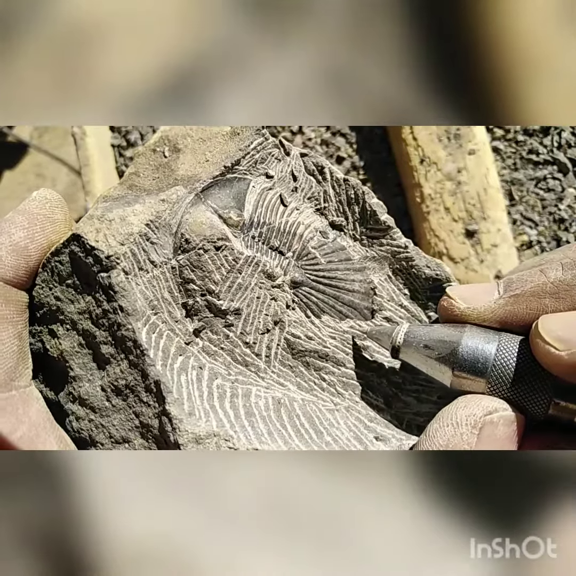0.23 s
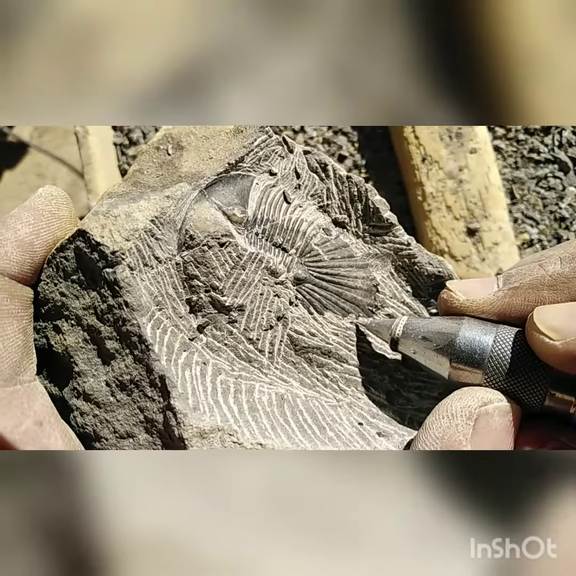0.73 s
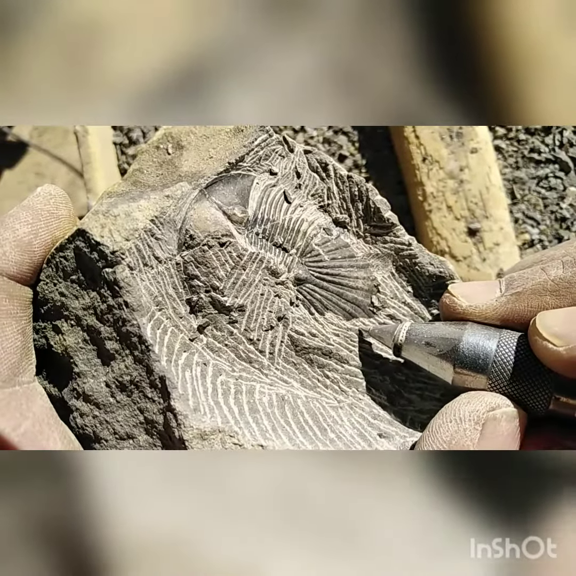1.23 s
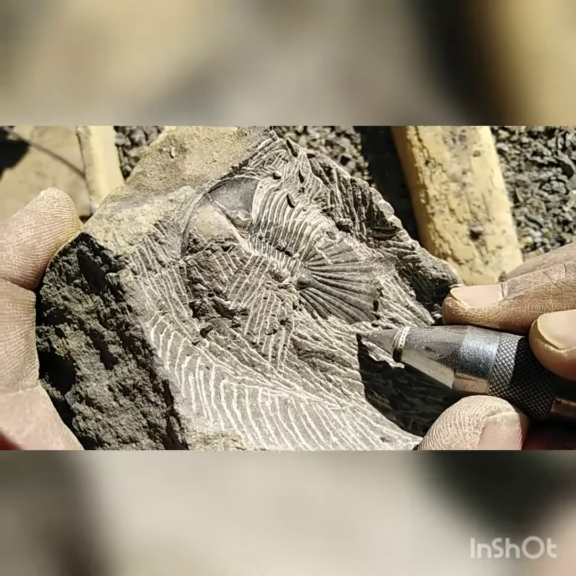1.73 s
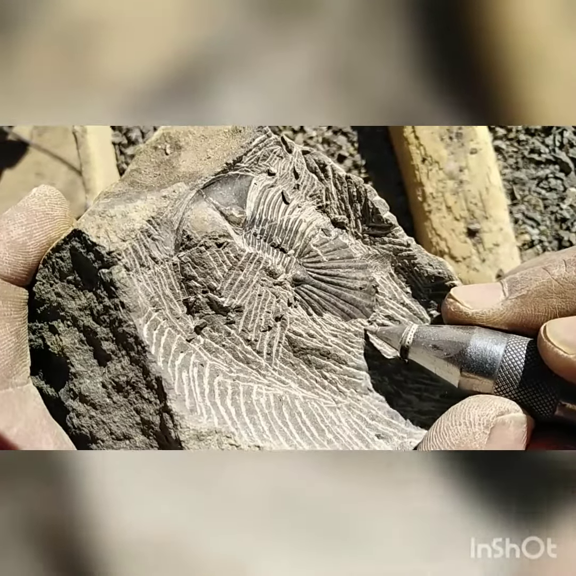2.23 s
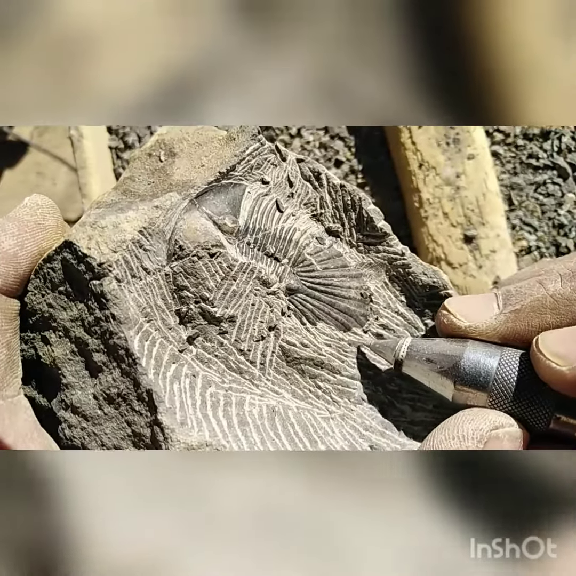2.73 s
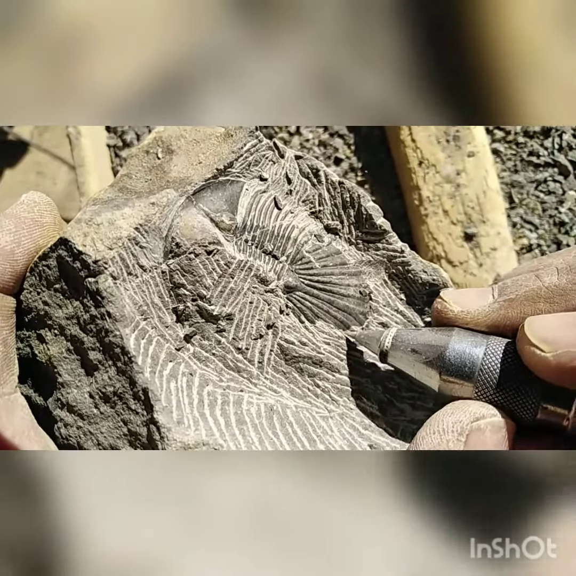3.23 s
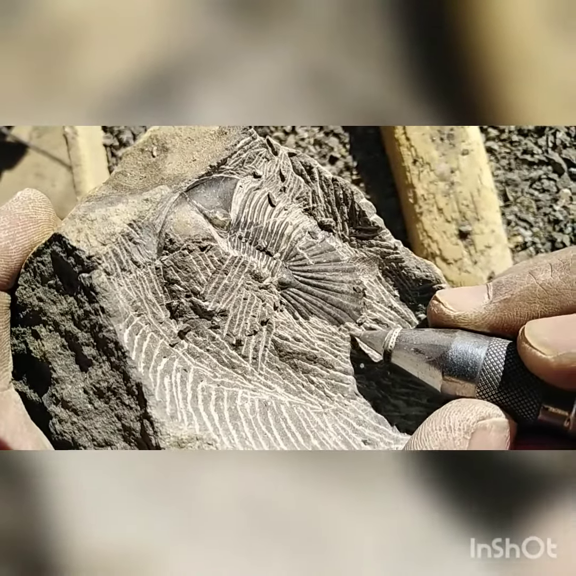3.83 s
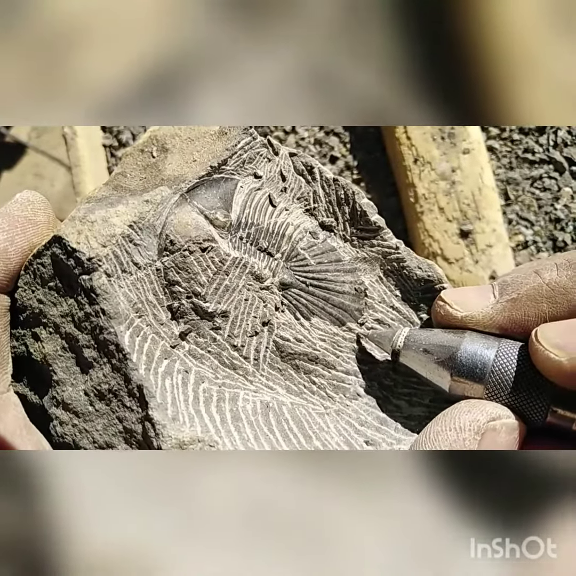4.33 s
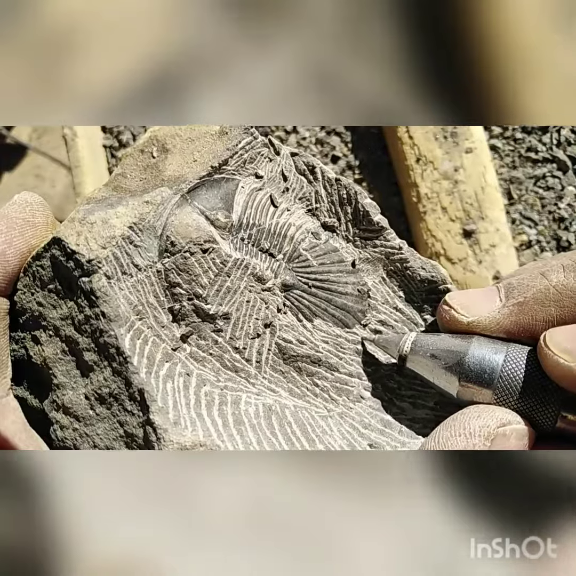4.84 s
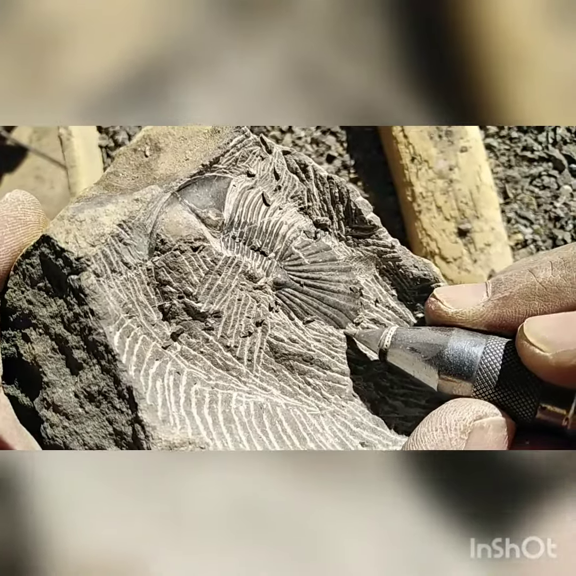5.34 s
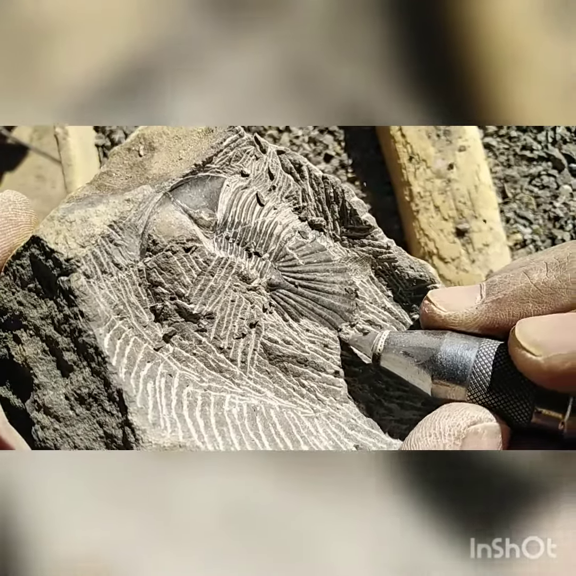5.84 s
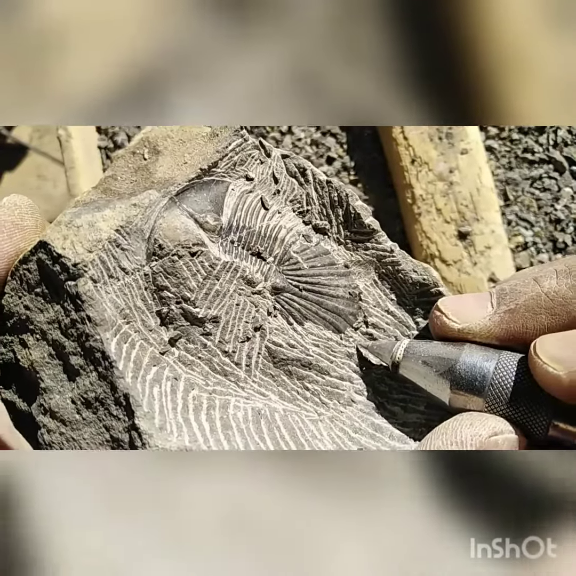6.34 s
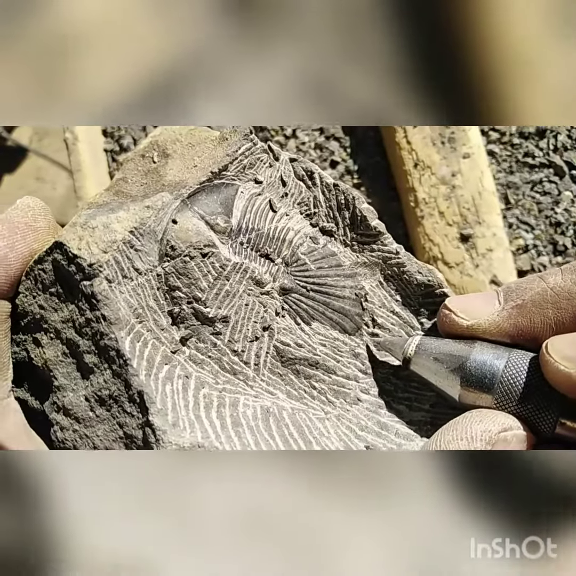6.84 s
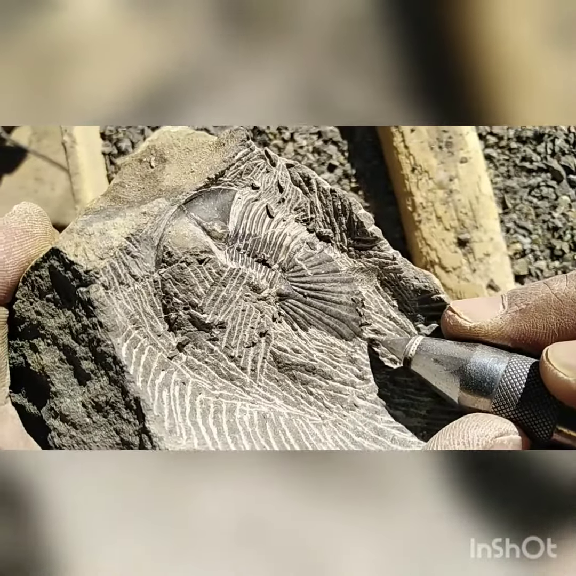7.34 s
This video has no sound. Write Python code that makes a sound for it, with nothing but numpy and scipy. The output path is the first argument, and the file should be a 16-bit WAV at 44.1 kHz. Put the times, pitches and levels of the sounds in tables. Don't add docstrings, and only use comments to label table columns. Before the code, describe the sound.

A small pneumatic scribe buzzes loudly up close, its low raspy drone rising under pressure as gritty, bright crackling bursts chip at stone.

```python
import sys
import numpy as np
from scipy import signal
from scipy.fft import irfft
from scipy.io import wavfile
from scipy.ndimage import uniform_filter1d, minimum_filter1d

SR = 44100
rng = np.random.default_rng(int(sys.argv[2]) if len(sys.argv) > 2 else 0)


def volts_from_db(level):
    exponent = np.asarray(level, float) / 20
    return 10 ** exponent


def generate_wav(sig):
    pcm = np.round(np.clip(np.atleast_2d(sig).T, -1, 1) * 32767).astype(np.int16)
    wavfile.write(sys.argv[1], SR, pcm)


N = 334719
T = np.arange(N) / SR
STEPS = np.arange(0, N / SR, .001)
FREE_HZ = 425.4
TIP_LAG = 17.5

# start_s, exhaust_db, hovering_graze_db, bright_crack_tilt_db
GRIP = [(0, -25.5, -35, -15), (.5, -25, -29, -8), (.9, -25.5, -45, -7), (1.4, -25.5, -40, -13),
        (2, -26, -33, -11), (2.6, -25.5, -43, -9.5), (3.3, -25.5, -38, -9.5), (3.8, -23, -28, -6),
        (4.3, -25, -30, -6.5), (4.6, -25, -20, -6), (5.3, -25.5, -26, -8), (5.9, -23.5, -25, -7.5),
        (6.24, -30.5, -41, -11), (6.33, -23, -31, -6), (6.6, -26.5, -33, -9), (6.9, -26, -26.5, -12.5),
        (7.2, -26.5, -30, -7), (7.59, -29, -29, -14.5)]


def evened(x):
    return x / np.sqrt(np.mean(x ** 2) + 1e-20)


def curves(rows):
    s, *columns = np.transpose(rows)
    return [np.interp(T, s, c) for c in columns]


def ramp(t0, t1):
    length = np.maximum(t1 - t0, 1e-3)
    return np.clip((STEPS - t0[:, None]) / length[:, None], 0, 1)


def read(points, hz):
    f, *columns = np.transpose(points)
    return np.array([np.interp(np.log(hz + 1), np.log(f), c) for c in columns])


def coloured(x, points, lag=0, size=2048):
    # pitch_hz, further_lag_rad
    further_lag = [(5800, -1.37), (6300, 1.88), (7250, 2.5), (7900, 0.68)]
    hz = abs(np.fft.fftfreq(size, 1 / SR))
    half = size // 2 + 1
    log_gain = np.log(volts_from_db(read(points, hz)) * np.sqrt(SR / 2))
    response = np.exp(np.conj(signal.hilbert(log_gain)))[:, :half]
    delay_rad = 2 * np.pi * np.arange(half) * lag / size
    if lag > 0:
        delay_rad = delay_rad + read(further_lag, hz[:half])[0]
    response[0] *= np.exp(-1j * delay_rad)
    return signal.oaconvolve(np.atleast_2d(x), irfft(response, size), axes=1)[:, :N]


def wash():
    # pitch_hz, density_db (per Hz)
    rumble = [(25, -100), (60, -82.5), (120, -74.5), (160, -71), (220, -72), (330, -76), (560, -78),
              (1200, -80.5)]
    # time_s, level_db
    breeze = [
        (0, -1.5),
        (1.5, -1.5),
        (4, 0),
        (6.2, 3.5),
        (6.7, -0.5),
        (7.59, 0),
    ]
    shared, left, right = rng.standard_normal((3, N))
    both = evened(np.array([shared + .55 * left, shared + .55 * right]))
    return volts_from_db(curves(breeze)[0] + [[-.8], [.8]]) * coloured(both, rumble, size=8192)


def knocks():
    # start_s, peak_db, pitch_hz, t60_s
    thuds = [
        (1.43, -34, 62.5, 0.25),
        (2.269, -34, 86.5, 0.34),
    ]
    out = np.zeros(N)
    for s, db, hz, t60 in thuds:
        t = np.maximum(T - s, 0)
        swell = 1 - np.exp(-t / 0.011)
        out += volts_from_db(db - 60 * t / t60) * swell * np.sin(2 * np.pi * hz * t)
    return out


def contact():
    # landing_s, lifting_s, landing_force_db, lifting_force_db
    stays = [(-0.03, 0.009, -23, -21), (0.347, 0.349, -17, -13.5), (0.419, 0.708, -11, -21),
             (0.727, 0.727, -19.0, -10.5), (0.976, 1.305, -12, -15), (1.321, 1.356, -18.7, -18.5),
             (1.499, 1.88, -15, -13), (1.887, 2.008, -18.0, -25), (2.069, 2.083, -10.5, -10),
             (2.126, 2.385, -20.5, -10), (2.403, 2.501, -15, -18.5), (2.64, 2.914, -15.5, -11.5),
             (2.947, 3.096, -17.5, -16.5), (3.123, 3.227, -14.5, -16), (3.366, 3.643, -14.5, -13.0),
             (3.657, 3.976, -14.5, -18.5), (4.021, 4.049, -27, -17.5), (4.095, 4.251, -15.5, -11.5),
             (4.278, 4.547, -12.5, -17), (4.591, 4.996, -15, -11), (4.988, 5.296, -12.5, -15),
             (5.371, 5.784, -14, -15), (5.812, 5.866, -24, -18), (6.005, 6.012, -8.5, -14),
             (6.069, 6.256, -27.5, -19), (6.262, 6.377, -20, -12.5), (6.399, 6.56, -14.3, -13.1),
             (6.919, 7.078, -12.5, -11), (7.11, 7.12, -13.5, -14.5), (7.228, 7.597, -14.0, -10)]
    land_s, lift_s = .015, .043
    firm_db = -14.5
    land, lift, first_db, last_db = np.transpose(stays)
    on_rock = ramp(land, land + land_s) * (1 - ramp(lift, lift + lift_s))
    force_db = first_db[:, None] + (last_db - first_db)[:, None] * ramp(land, lift)
    force = (on_rock * volts_from_db(force_db)).max(0)
    touch = np.minimum(force / volts_from_db(firm_db), 1)
    return np.interp(T, STEPS, force), np.interp(T, STEPS, touch)


def stroke_rate(force):
    # start_s, deepest_s, deepest_rate_hz, let_go_s, let_go_rate_hz
    pushes = [(0.343, 0.742, 494, 0.744, 498), (0.939, 1.216, 483, 1.347, 462),
              (1.459, 1.842, 502, 1.891, 447), (2.212, 2.42, 515, 2.443, 477),
              (2.301, 2.48, 487, 2.491, 491), (2.675, 3.027, 547, 3.032, 544),
              (2.905, 3.086, 512, 3.126, 492), (3.1, 3.138, 459, 3.232, 446),
              (3.517, 3.765, 518, 3.954, 495), (3.9, 3.957, 483, 4.057, 423), (4.083, 4.5, 502, 4.508, 507),
              (4.636, 4.719, 450, 4.85, 448), (4.778, 4.951, 506, 5.145, 520),
              (5.1, 5.148, 482, 5.288, 420), (5.459, 5.627, 529, 5.667, 534),
              (5.512, 5.739, 518, 5.816, 501), (5.749, 5.816, 487, 5.873, 460),
              (6.231, 6.491, 662, 6.493, 681), (6.45, 6.499, 472, 6.596, 415),
              (6.906, 7.013, 503, 7.09, 500), (7.275, 7.524, 570, 7.538, 558),
              (7.449, 7.548, 508, 7.6, 523)]
    push_curve, snap_s = 1.28, .014
    touch_hz = 18
    start, deep, deep_hz, go, go_hz = np.transpose(pushes)
    climb = (deep_hz - FREE_HZ)[:, None] * ramp(start, deep) ** push_curve
    drift = (go_hz - deep_hz)[:, None] * ramp(deep, go)
    pushed = ((climb + drift) * (1 - ramp(go, go + snap_s))).max(0)
    return FREE_HZ + np.maximum(np.interp(T, STEPS, pushed), touch_hz * force)


def strokes(force):
    hz = stroke_rate(force)
    pressed = np.clip((hz / FREE_HZ - 1) / .15, 0, 1.5)
    wander = uniform_filter1d(rng.standard_normal(N), size=250)
    wander = evened(uniform_filter1d(wander, size=250))
    hz = hz * (1 + (.002 + .017 * pressed) * wander)
    return hz, np.cumsum(hz) / SR, pressed


def per_stroke(turns, smooth):
    draw = rng.standard_normal(N // 40)[turns.astype(int)]
    return uniform_filter1d(draw, size=smooth)


def leak(turns):
    # pitch_hz, left_db, right_db (per Hz)
    hiss = [(434, -78, -76.5), (1140, -101.5, -78.5), (2080, -99.5, -74), (3290, -92.5, -95),
            (4720, -75, -67.5), (5240, -103, -61.5), (6340, -74, -70.5), (7000, -72, -55.5),
            (7200, -62, -59.5), (8860, -61, -64.5), (9720, -63, -80), (10800, -83, -65),
            (11700, -71.5, -80), (14000, -70.5, -68)]
    shared, left, right = rng.standard_normal((3, N))
    puff = 3.0 + np.exp(-(turns % 1) / 1.0)
    flutter = volts_from_db(1.57 * evened(uniform_filter1d(rng.standard_normal(N), size=900)))
    air = puff * flutter * np.array([.5 * shared + left, .5 * shared + right])
    return volts_from_db(.1) * coloured(evened(air), hiss, TIP_LAG)


def tip(turns, pressed, force_on_rock, edge_hz=7700):
    # pitch_hz, left_db, right_db (per Hz)
    rock = [(1500, -90, -94), (2630, -66, -65.5), (4030, -73.5, -60.5), (5740, -68, -53), (5910, -59, -44),
            (6430, -46.5, -35.5), (7120, -48.5, -42.5), (7620, -54, -47.5), (8720, -50.5, -54),
            (8140, -52, -49), (9400, -56.5, -57.5), (9300, -63, -60.5), (12600, -66.5, -63.5),
            (15000, -67.5, -73.5)]
    grit_db = 4
    _, graze_db, tilt_db = curves(GRIP)
    depth = np.minimum(uniform_filter1d(pressed, size=900), 1)
    bright_db = tilt_db + grit_db * depth - 1.5

    landing = turns + .3 + .06 * per_stroke(turns + 0.52, smooth=30)
    tick = np.diff(np.floor(np.maximum.accumulate(landing)), prepend=0)
    phase = landing % 1
    shared, left, right = rng.standard_normal((3, N))
    crunch = (np.exp(-phase / .25) + .2) * np.array([shared + .7 * left, shared + .7 * right])

    uneven = volts_from_db(2.4 * per_stroke(turns + .8, smooth=1))
    skitter = volts_from_db(1.6 * evened(uniform_filter1d(rng.standard_normal(N), size=500)))
    crack = evened(uneven * skitter * (evened(tick) + 1.4 * evened(crunch)))
    force = np.hypot(force_on_rock, volts_from_db(graze_db))
    ring = coloured(crack * force * volts_from_db(12.5), rock, TIP_LAG)
    band = signal.butter(3, [edge_hz, 1.46 * edge_hz], "band", fs=SR, output="sos")
    top = signal.sosfiltfilt(band, ring)
    return ring + (volts_from_db(bright_db + 10.5) - 1) * top


def exhaust(hz, turns, pressed, touch, count=19, size=32):
    # pitch_hz, left_db, right_db, left_lag_rad
    pop = [(430, -37, 16, 0.56), (950, -33, -29.5, 1.64), (1303, -35.5, -28, 3.02), (1697, -37, -28, 5.63),
           (1701, -29.5, -23.5, 2.27), (2112, -31, -25.5, 2.8), (2210, -31, -31, 3.14),
           (2340, -31, -31, 3.14), (2448, -31.5, -28, 4.64), (2826, -33.5, -32, 4.25),
           (3424, -41.5, -40.5, 5.9), (3860, -48, -38, 7.7), (5140, -45.5, -40, 15.7),
           (6010, -39, -26.5, 14.6), (6620, -36.5, -69, 20.6)]
    return_s = 0.001109
    muffle_db, strain_db, vent_db = -0.82, 2.5, 2
    waver_db, waver_loaded_db = 1.3, .7
    overtone_db, follow = -24.5, .1

    load = uniform_filter1d(pressed, size=900)
    pressed_before = uniform_filter1d(pressed, size=2400, origin=1100)
    vent = np.clip(pressed_before - load - .12, 0, .3) / 0.49
    air_db = curves(GRIP)[0] + vent_db * vent
    tone_db = air_db + 2.0 + muffle_db * touch + 0.66 * load
    over_db = overtone_db + follow * (air_db + 24.5) + 0.5 * vent_db * vent
    over_db = over_db + 1.7 * muffle_db * touch + strain_db * load

    slow_hz = hz[::size]
    stroke = np.exp(2j * np.pi * turns)
    over = np.zeros((2, N))
    turn = stroke
    for k in range(2, count):
        turn = turn * stroke
        left_db, right_db, lag = read(pop, k * slow_hz)
        back = 0.89 * np.exp(-k / 7.3 - 2j * np.pi * k * slow_hz * return_s)
        sharper_db = 5.06 * pressed[::size] * np.clip(k * slow_hz / 1500 - 1.7, 0, 1)
        both = rng.standard_normal(len(slow_hz))
        own = rng.standard_normal((2, len(slow_hz)))
        flap = uniform_filter1d(both + .15 * own, size=28)
        flap = evened(uniform_filter1d(flap, size=28))
        change_db = sharper_db + (waver_db + waver_loaded_db * touch[::size]) * flap
        port_lag = np.exp(-1j * np.array([lag, 0 * lag]))
        weight = volts_from_db([left_db, right_db] + change_db) * port_lag * (1 - back)
        over += (np.repeat(weight, size, axis=1)[:, :N] * turn).real

    tone = volts_from_db(tone_db + [[-2.6], [5.4]]) * np.cos(2 * np.pi * turns - [[.78], [0]])
    uneven = volts_from_db((1.86 + 0.26 * pressed) * per_stroke(turns + .5, smooth=40))
    alternate = 1 + 0.024 * np.cos(np.pi * turns)
    return (tone + volts_from_db(over_db + 25.5) * over * uneven) * alternate


def scene():
    force, touch = contact()
    hz, turns, pressed = strokes(force)
    background = wash() + knocks()
    tool = leak(turns) + tip(turns, pressed, force) + exhaust(hz, turns, pressed, touch)
    return background + tool


def masked_out(x, margin_db=-11.0):
    # pitch_hz, level_db (against the mean power of the moment)
    floor = [(450, -60), (620, -22), (1400, -19), (2300, -11), (3500, -12.5), (5200, -14), (6000, -40),
             (10500, -28), (11400, -14.5), (13400, -11), (14000, -24)]
    hz, _, z = signal.stft(x, SR, nperseg=2048, noverlap=1024)
    power = abs(z) ** 2
    near = uniform_filter1d(power, size=60, axis=1) * volts_from_db(2 * margin_db) * (hz > 1300)[:, None]
    moment = power.mean((0, 1)) * volts_from_db(2 * read(floor, hz).T)
    local = uniform_filter1d(power, size=7, axis=1)
    kept = z * (local > near + moment)
    return signal.istft(kept, nperseg=2048, noverlap=1024)[1][:, :N]


def band_limit(x):
    return signal.sosfilt(signal.butter(12, 14430, fs=SR, output="sos"), x)


def record(dry):
    high = signal.butter(2, 3500, "high", fs=SR, output="sos")
    treble = signal.sosfiltfilt(high, dry)
    peak = -minimum_filter1d(-abs(dry), size=41, axis=1)
    reduction = uniform_filter1d(np.maximum(peak / .95, 1), size=41, axis=1)
    held = dry - treble + treble / reduction
    low_pass = signal.firwin(401, 14400, window=("kaiser", 9), fs=SR)
    limited = signal.oaconvolve(held, low_pass[None], "same")
    pair = np.array([[1, 1], [1, -1.012]]) / np.sqrt(2)
    by_port = pair @ masked_out(pair @ limited)
    mix = np.clip(masked_out(by_port), -1, 1)
    return band_limit(mix)


dry = scene()
out = record(dry)
generate_wav(out)
```